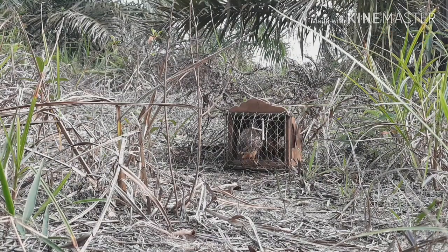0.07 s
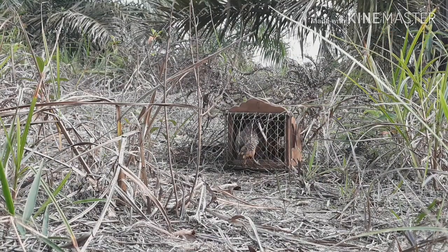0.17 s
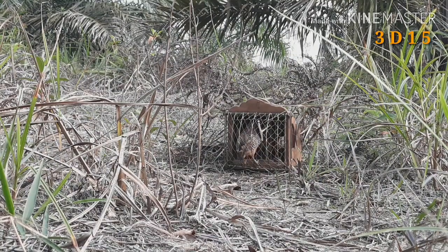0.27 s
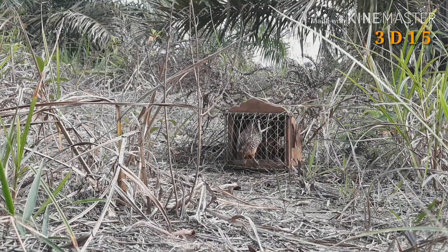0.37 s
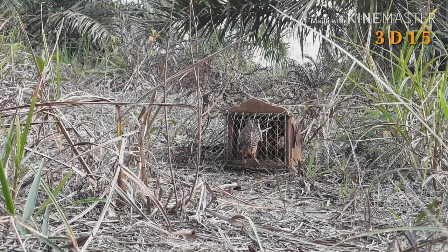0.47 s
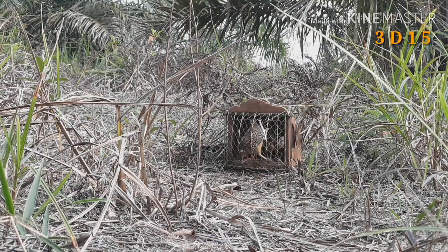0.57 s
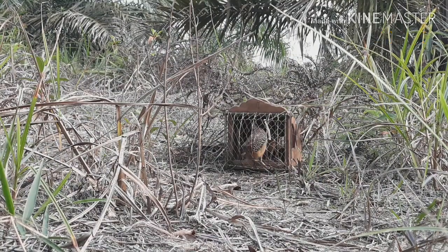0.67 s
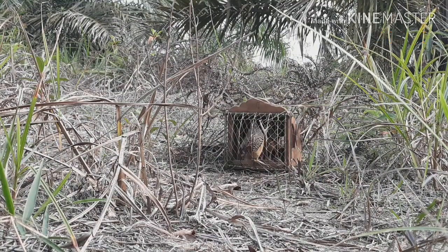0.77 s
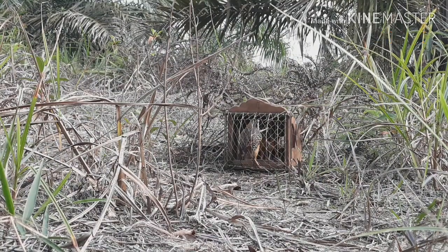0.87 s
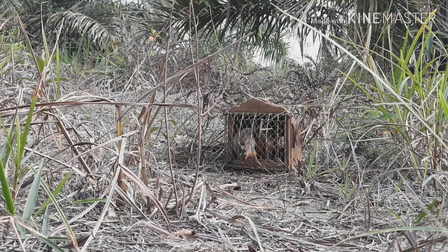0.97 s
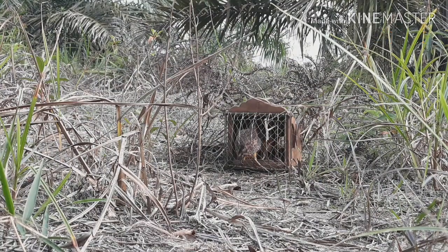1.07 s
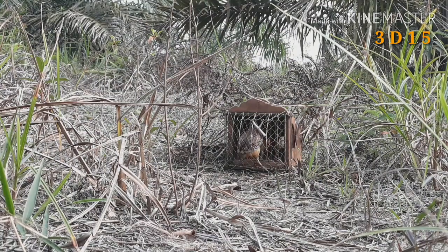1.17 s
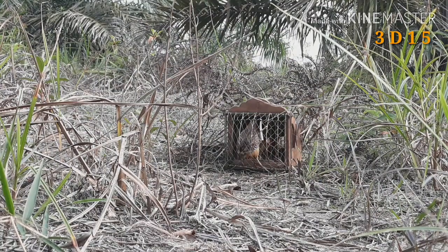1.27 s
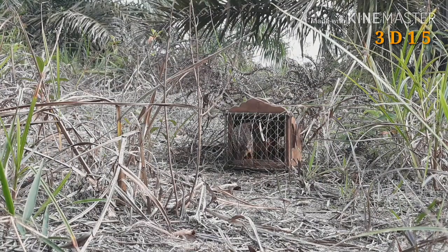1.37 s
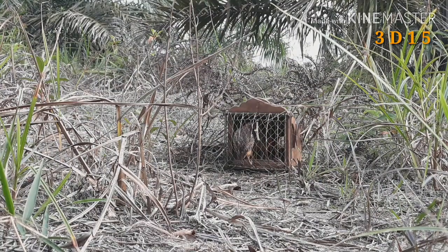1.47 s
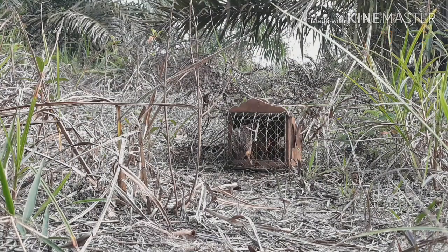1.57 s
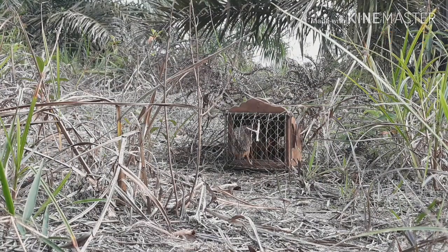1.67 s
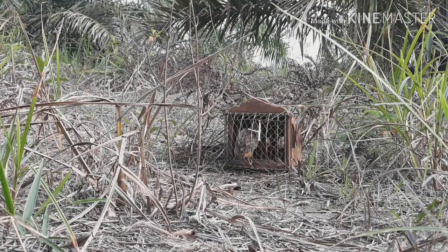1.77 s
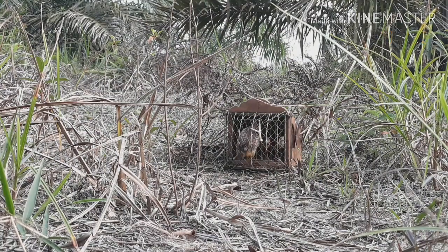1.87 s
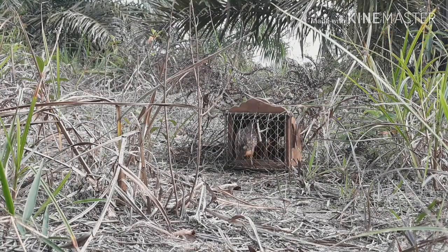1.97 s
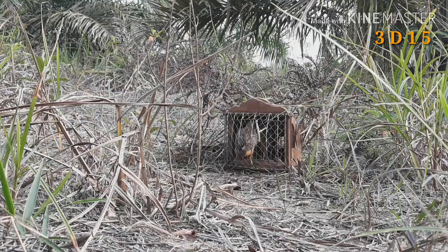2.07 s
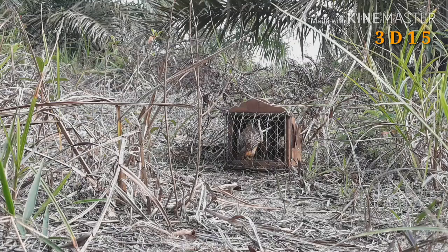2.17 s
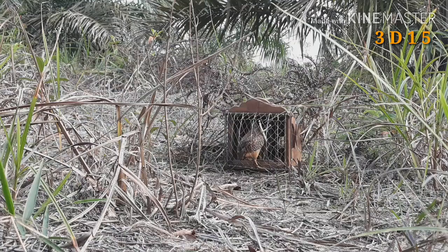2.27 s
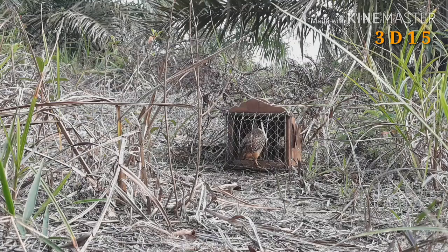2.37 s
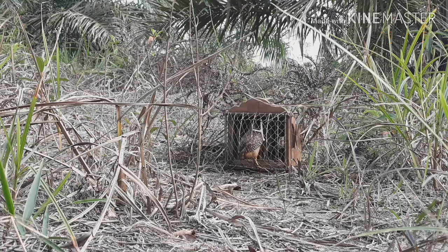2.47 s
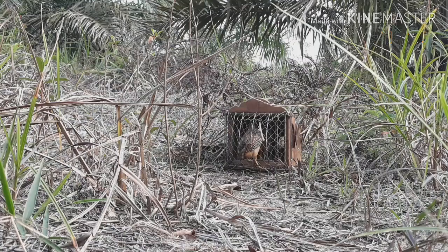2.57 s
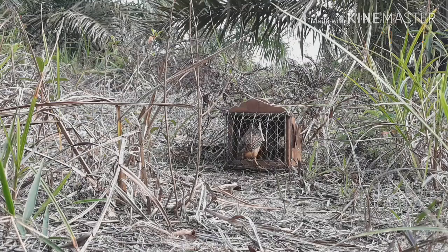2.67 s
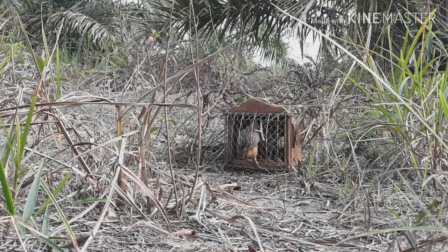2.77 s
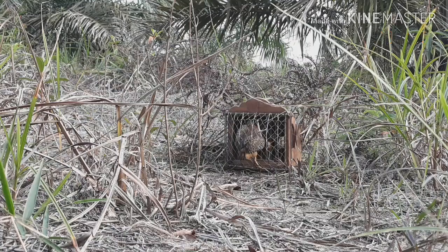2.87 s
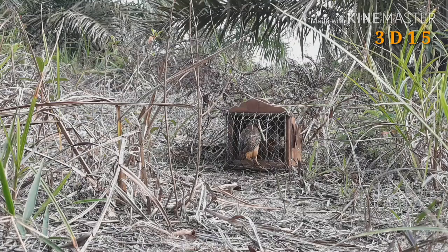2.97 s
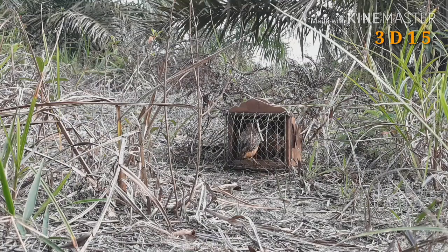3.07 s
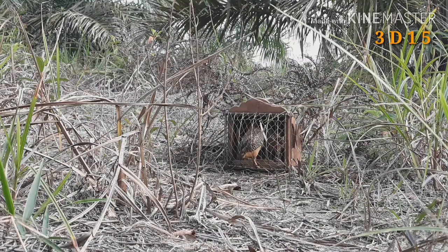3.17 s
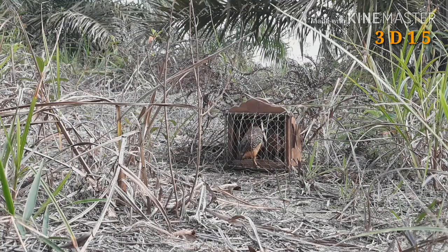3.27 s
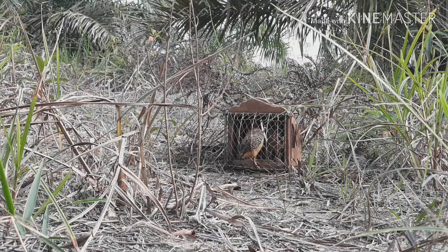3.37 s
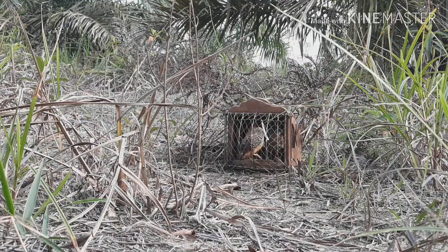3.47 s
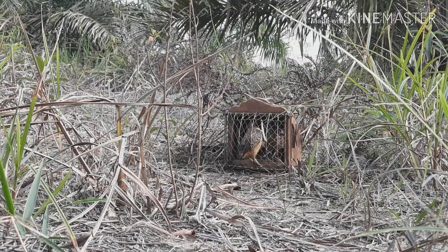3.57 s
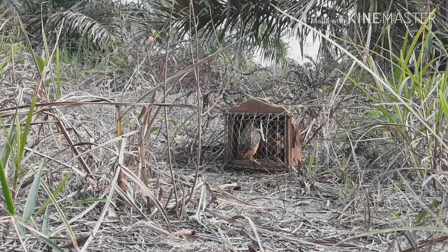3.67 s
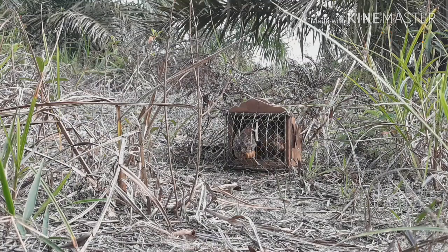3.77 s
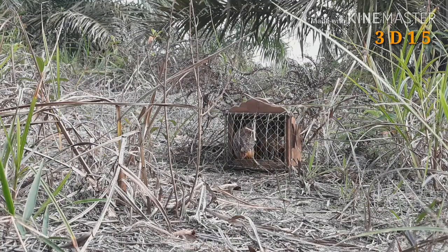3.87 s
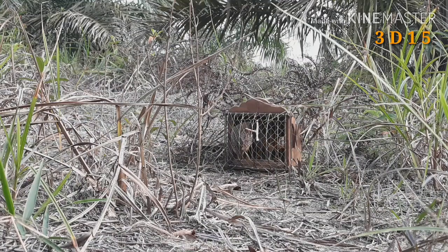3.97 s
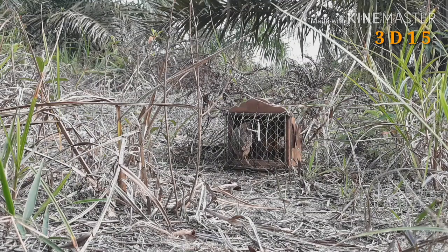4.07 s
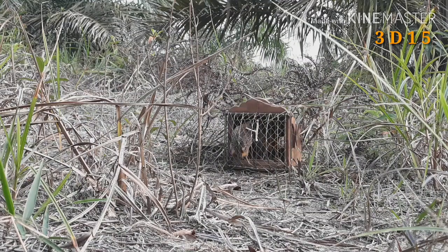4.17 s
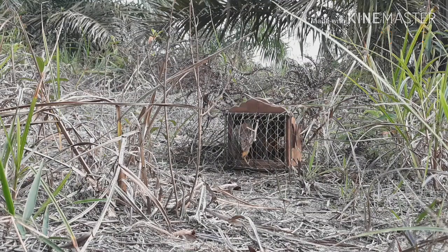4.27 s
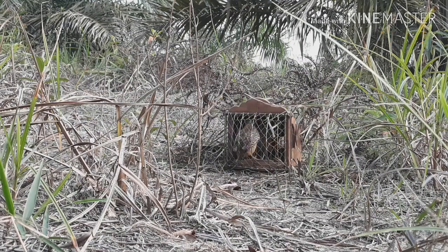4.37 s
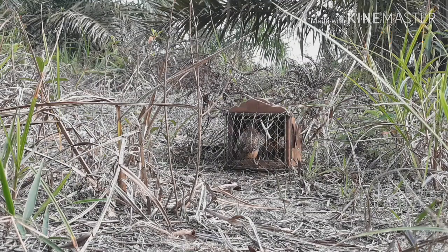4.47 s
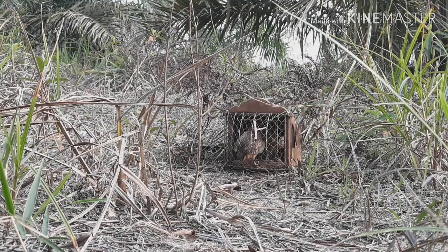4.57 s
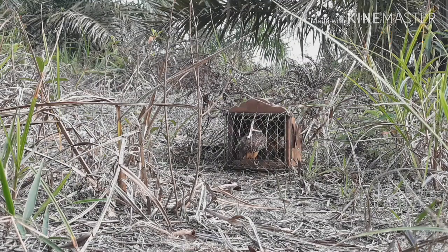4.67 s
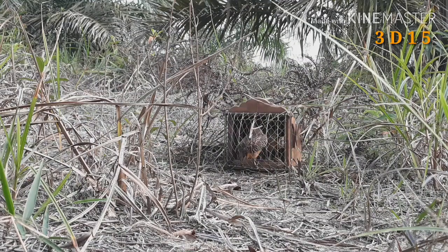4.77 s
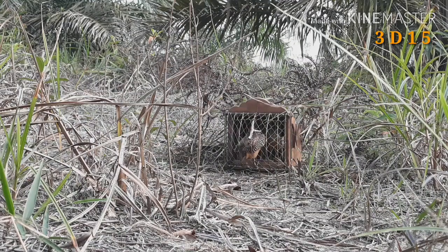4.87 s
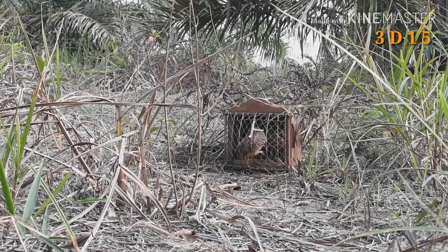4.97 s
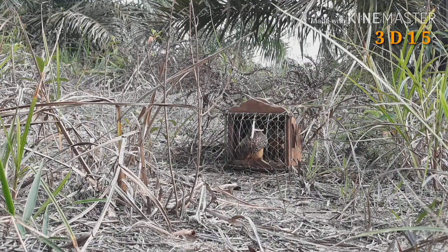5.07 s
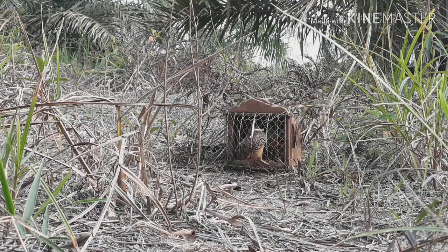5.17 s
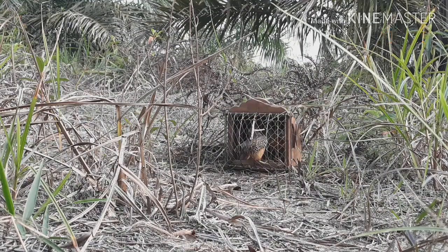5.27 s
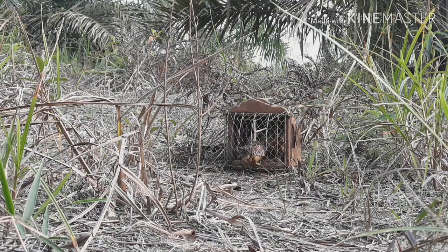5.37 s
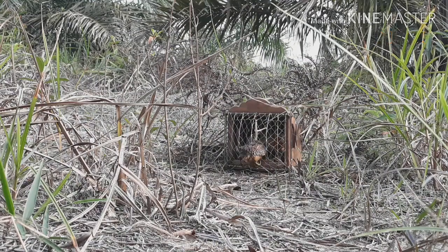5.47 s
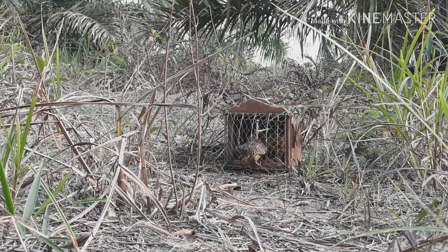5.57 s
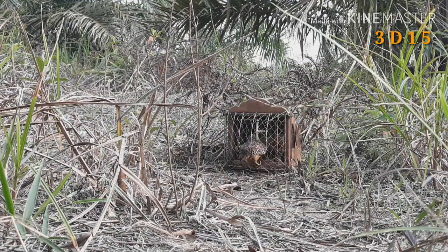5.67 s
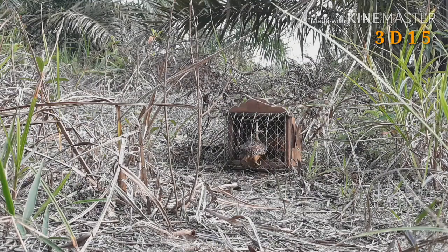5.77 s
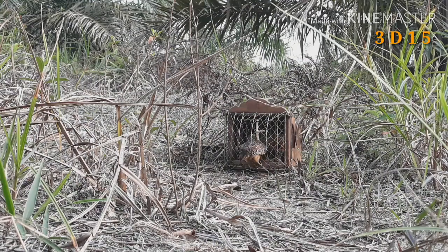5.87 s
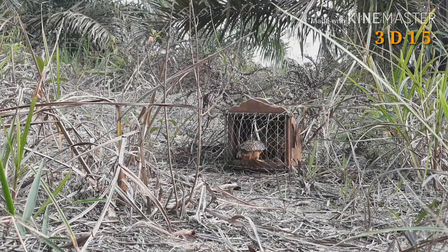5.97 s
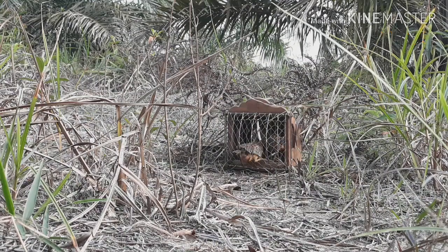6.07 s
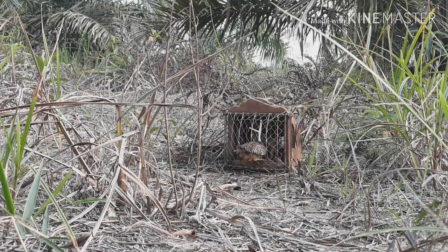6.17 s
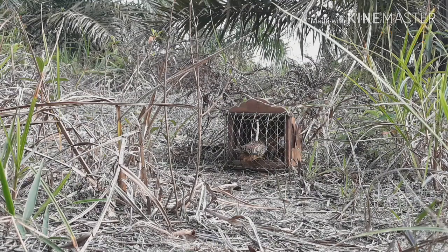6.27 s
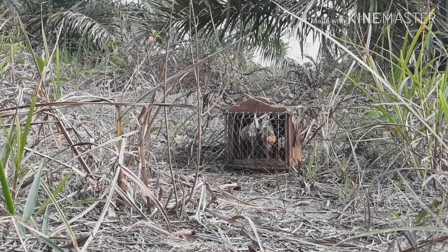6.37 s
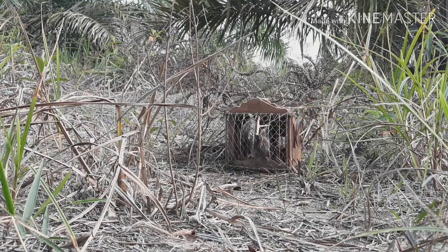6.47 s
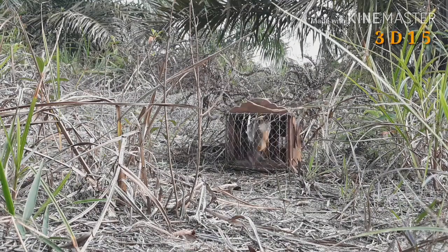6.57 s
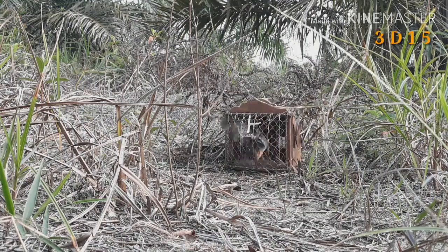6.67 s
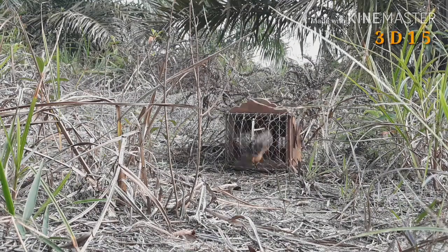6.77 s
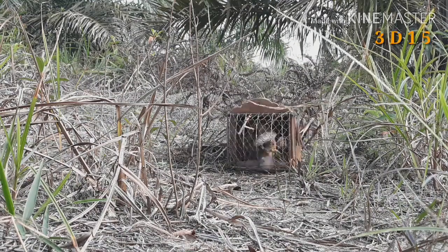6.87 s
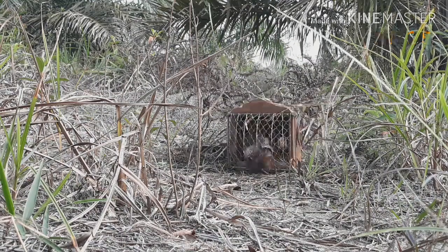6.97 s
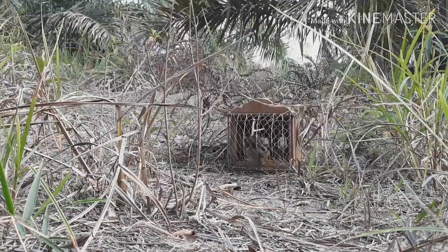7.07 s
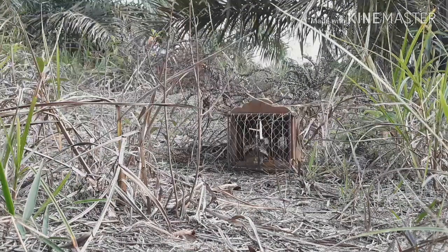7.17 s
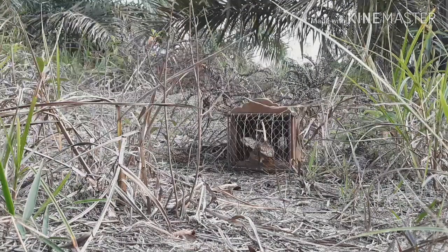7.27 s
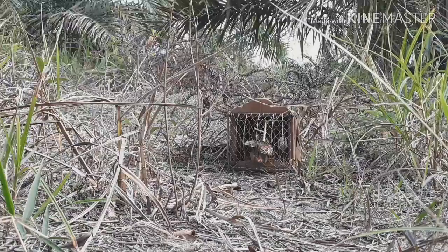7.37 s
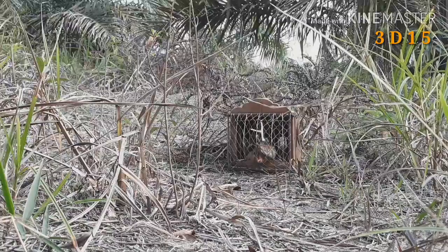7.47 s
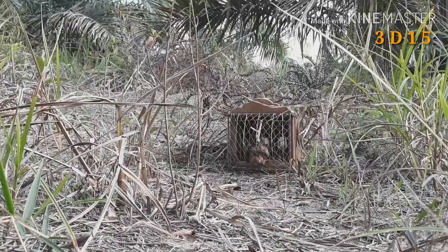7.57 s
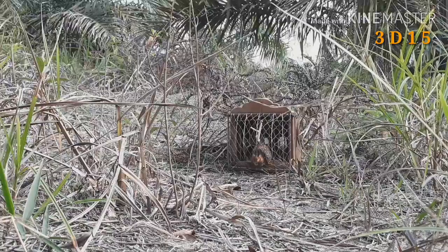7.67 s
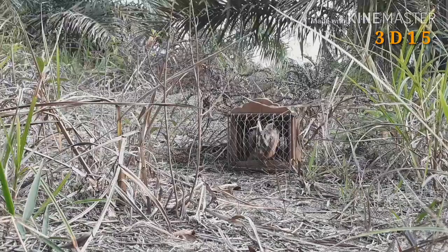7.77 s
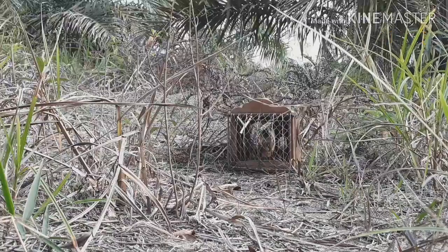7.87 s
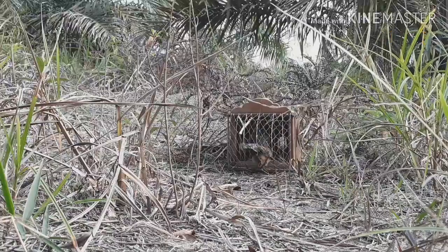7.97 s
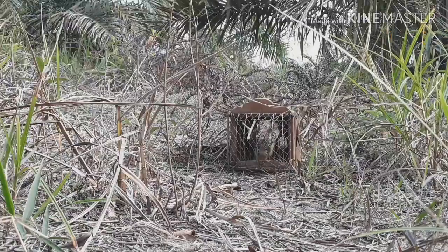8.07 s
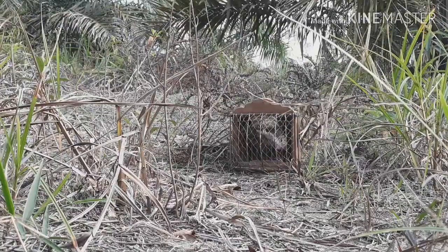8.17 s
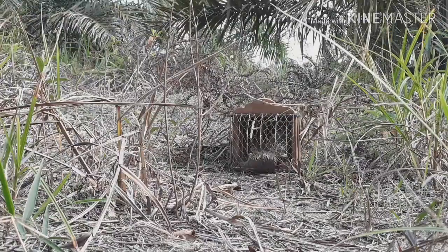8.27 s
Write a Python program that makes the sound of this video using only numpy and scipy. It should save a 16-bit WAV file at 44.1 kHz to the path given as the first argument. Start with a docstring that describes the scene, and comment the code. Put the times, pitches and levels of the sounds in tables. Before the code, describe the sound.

A caged quail scuffles and knocks on thin wooden boards, claws ticking on wire mesh and wings rustling, over faint outdoor hiss.

```python
"""Knocks and scuffles on thin boards: a quail scrambles in a small wood and wire cage in dry scrub.
Feet and body ring the boards' modes, claws and beak tick on the mesh, feathers rustle and brush the
wires, wings thrash the grass bedding and a strained joint creaks. Behind: a throbbing cricket, field
hiss, a distant engine slowing down, a low drone, a far songbird and another bird's rasping chatter."""
import sys
import numpy as np
from scipy import signal
from scipy.fft import rfft, irfft, next_fast_len
from scipy.io import wavfile

SR = 44100
rng = np.random.default_rng(int(sys.argv[2]) if len(sys.argv) > 2 else 0)


def int16_out(signal):
    """Quantize to a 16-bit WAV file."""
    q = np.round(np.clip(np.atleast_2d(signal).T, -1, 1) * 32767)
    wavfile.write(sys.argv[1], SR, q.astype(np.int16))


N = 366912

# Table levels are relative within a layer.
# Each row: start in seconds, strength in dB, pitch of the spot struck in Hz, rattle t60 in seconds.
BOARD_KNOCKS = [(.021, -8, 980, 0.047), (.107, -16, 950, 0.05), (.114, -24, 720, .05),
                (.184, -14.5, 398, .08), (.185, -16, 2070, .04), (.217, -30, 1260, .08),
                (.26, -39, 1220, .067), (.285, -37, 1190, .03), (.311, -30, 800, .05),
                (.315, -17, 1390, 0.035), (.439, -54.5, 1170, 0.07), (.671, -47, 564, 0.093),
                (.713, -49, 1150, 0.073), (.749, -35, 1010, 0.059), (.78, -40, 600, .08),
                (.804, -38, 950, 0.22), (.985, -45.5, 581, .14), (1.011, -39.5, 1090, 0.067),
                (1.034, -16.5, 960, 0.03), (1.04, -22, 600, .05), (1.061, -33, 1180, 0.15),
                (1.135, -41, 646, .055), (1.199, -36, 1770, 0.1), (1.65, -47, 613, 0.11),
                (1.665, -44, 1200, .1), (1.757, -42, 800, 0.12), (1.805, -47, 1100, .05),
                (1.844, -37, 600, .07), (1.853, -38.5, 1200, 0.052), (1.866, -39, 500, .06),
                (1.878, -36, 760, 0.14), (1.922, -38, 1100, .03), (1.941, -29, 1220, 0.07),
                (1.943, -35, 600, .06), (1.989, -40, 468, .048), (2.036, -43, 458, .068),
                (2.088, -50, 1200, .05), (2.233, -51, 608, 0.069), (2.431, -46, 650, 0.17),
                (2.89, -27, 700, .13), (2.945, -41, 684, .05), (2.958, -40, 1120, .054),
                (2.974, -34, 1000, .14), (2.996, -26, 900, 0.06), (3.004, -33, 610, .06),
                (3.083, -48, 1150, .15), (3.137, -56, 1000, 0.11), (3.352, -47.5, 980, .084),
                (3.469, -46, 476, .055), (3.548, -44.5, 490, 0.21), (3.629, -43, 382, .1),
                (3.785, -52, 1000, .06), (4.217, -46.5, 1210, 0.2), (4.339, -41, 1050, .074),
                (4.383, -22, 700, .08), (4.4, -25, 1050, .05), (4.407, -27, 600, .2),
                (4.469, -36, 620, .06), (4.552, -23, 1150, 0.08), (4.566, -30, 600, .08),
                (4.986, -39.5, 1470, 0.076), (5.073, -50.5, 1150, 0.086), (5.207, -30, 400, .03),
                (5.228, -17, 340, .06), (5.408, -32, 400, .085), (5.703, -50, 460, .06),
                (5.79, -40, 410, 0.032), (5.942, -49.5, 1080, .17), (6.05, -45, 1220, 0.2),
                (6.076, -26, 635, .06), (6.112, -37, 958, .08), (6.151, -33, 1150, 0.16),
                (6.203, -29, 980, 0.041), (6.238, -35, 1260, .06), (6.333, -8, 1130, .05),
                (6.343, -20, 600, .1), (6.363, -5, 1120, 0.03), (6.37, -13, 1220, .08),
                (6.415, -29, 1240, .043), (6.437, -29, 1230, 0.12), (6.459, -30, 1900, .03),
                (6.496, -40, 1190, 0.037), (6.532, -26.5, 860, 0.15), (6.579, -33, 1050, .1),
                (6.591, -29, 1100, .06), (6.604, -25, 1200, .06), (6.675, -32.5, 500, .068),
                (6.724, -29, 1040, 0.11), (6.816, -28, 1150, .066), (6.828, -22, 1150, .06),
                (6.84, -5, 990, 0.11), (6.865, -26, 650, 0.13), (6.897, -26, 600, .04),
                (6.93, -23, 1500, 0.033), (6.97, -26, 896, 0.071), (7.02, -37, 600, .1),
                (7.067, -39, 500, 0.067), (7.166, -16, 790, .07), (7.331, -48, 597, 0.028),
                (7.431, -42, 980, .078), (7.455, -53, 643, .053), (7.519, -45, 760, 0.14),
                (7.583, -46, 960, 0.087), (7.724, -33, 900, .034), (7.77, -31, 1000, 0.061),
                (7.795, -7, 1170, 0.11), (7.807, -20, 1000, .08), (7.869, -19, 620, .06),
                (7.873, -15, 1150, 0.094), (7.978, -30, 1230, .05), (8.008, -35, 700, 0.069),
                (8.04, -23, 1250, 0.035), (8.087, -24, 384, .02), (8.105, -3, 1060, .12),
                (8.1154, -11, 1060, .08), (8.122, -12, 594, 0.04), (8.129, -10, 700, .04),
                (8.146, -16, 1150, .1), (8.172, -19, 1100, .066), (8.186, -15, 1100, .06),
                (8.19, -17, 607, .076), (8.205, -16, 1020, 0.05), (8.235, -25, 1110, .04),
                (8.249, -29, 638, .06), (8.289, -18, 930, .06)]
# Each row: frequency in Hz, level in dB, t60 in seconds.
BOARD_MODES = [(213, -22.5, 0.014), (325, -7.5, 0.041), (395, -10, 0.035), (487, -3.5, 0.032),
               (606.6, -1.5, 0.052), (714, -5.5, 0.053), (836, -2.5, 0.018), (957.4, -2, 0.034),
               (1059, -2, 0.029), (1171, 3, 0.021), (1246, -5, 0.038), (1487, -6, 0.018),
               (1674, -3.5, 0.013), (1973, -15.5, 0.062), (2054, -10.5, 0.034)]
# Motion between blows. Each row: time in seconds, board rumble in dB, feather rustle in dB.
SCRAMBLE_CURVE = [(0.0, -49, -62), (.42, -60.5, -76), (.58, -77, -76), (.93, -62, -72.5), (1.3, -70, -74.5),
                  (1.6, -74, -74), (1.9, -59, -77), (2.2, -73.5, -90), (2.6, -81.5, -79.5),
                  (3.11, -72, -65.5), (3.7, -71, -70), (4.15, -79, -81), (4.42, -48, -59),
                  (4.61, -70.5, -70.5), (5.1, -82, -71), (5.23, -58, -47), (5.33, -63, -59),
                  (5.49, -77, -59), (5.6, -82, -70), (6.02, -73, -70), (6.15, -47, -57.5),
                  (6.29, -53.5, -63), (6.37, -38, -50), (6.62, -39, -54), (6.78, -46, -55),
                  (6.97, -31.5, -57), (7.11, -64, -72), (7.7, -65, -77), (7.9, -40.5, -54),
                  (8.06, -53.5, -64.5), (8.14, -37, -49.5), (8.32, -36, -49)]
# Body and wings on the boards. Each row: centre in seconds, level in dB, half-length in seconds.
BODY_DRAGS = [(.05, -53, 0.027), (1.89, -56, 0.037), (6.352, -28, .015), (6.455, -39.5, .03),
              (6.6, -34, 0.045), (6.74, -43, 0.024), (6.83, -29, 0.015), (6.875, -30.5, 0.032),
              (6.94, -43, 0.026), (7.815, -37, .025), (7.86, -34, 0.033), (7.93, -40.5, 0.032),
              (8.125, -29, 0.023), (8.2, -31, 0.031), (8.28, -38, 0.044)]
# Noise spectra. Each row: frequency in Hz, spectral density in dB.
RUSTLE_SPECTRUM = [(880, -68), (1500, -12.5), (3150, -3.5), (4870, 1), (6430, -4), (8830, -1), (10100, -2),
                   (14800, -9), (16000, -2)]
BEDDING_SPECTRUM = [(76, -51), (130, -0.5), (340, -0.5), (454, 0.5), (862, -8), (1100, -17), (1980, -3),
                    (6000, -11), (7800, -36), (13200, -120)]
FIELD_SPECTRUM = [(18, -29), (30, -16.5), (115, 9.5), (153, 1), (437, -20.5), (889, -71), (988, -66),
                  (1540, -34), (2680, -31.5), (4910, -19.5), (6550, -23.5), (7670, -23.5), (9710, -24),
                  (14800, -30.5), (16000, -19)]
# Each row: start in seconds, end in seconds, level in dB.
CRICKET_BOUTS = [(.0, .72, -70), (1.84, 2.3, -74.5), (3.994, 5.077, -71.5)]
# Each row: time in seconds, firing rate in Hz, level in dB.
ENGINE_CURVE = [(0.0, 61.55, -71), (.7, 59, -62.5), (5.37, 43.7, -64), (8.32, 43.2, -66)]
# Each row: frequency in Hz, level in dB.
DRONE_TONES = [(85, -72), (115, -78), (150.7, -60.5), (181, -67), (200, -71.5)]
# Each row: start in seconds, strength in dB, offset for the wires in dB, scrape t60 in seconds.
MESH_TICKS = [(0.013, -29.5, -15, .04), (.0297, -34.5, -5.5, .032), (.1856, -27.5, -2.5, 0.048),
              (.211, -40, -2, .088), (0.283, -34, -3.5, 0.064), (.316, -41, 5, .03),
              (0.7804, -35, -5, 0.032), (0.81, -22, -9.5, 0.056), (.846, -37, -2.5, .12),
              (.948, -42, -12, .03), (.985, -40, -5, .03), (1.0686, -40.5, 3, .034), (1.113, -40, -10, .03),
              (1.1957, -29, -11, .06), (1.931, -39, -12, .044), (2.0868, -32, -12.5, .04),
              (2.3555, -32.5, -23, 0.15), (2.854, -45, -3.5, .03), (2.957, -36, -17, .04),
              (2.9761, -33, -22, .056), (2.9954, -27.5, -3, .033), (3.0807, -31, -8, 0.07),
              (3.1223, -39, -5, .04), (3.178, -36, -4, 0.025), (3.3164, -29.5, -30, 0.098),
              (3.548, -43, -1, .036), (3.6304, -30, -9, 0.039), (3.6656, -31, -18, .12),
              (3.8225, -29, -13, 0.16), (3.925, -34, -22, .04), (4.2123, -27, -11.5, 0.13),
              (4.332, -21, -14, .04), (4.399, -18, -10.5, 0.019), (4.4952, -39, -17, .04),
              (4.539, -41.5, 2, 0.045), (4.5775, -26, -18, 0.15), (5.071, -40, -6, 0.054),
              (5.18, -40, 4, .08), (5.207, -36, 7, .07), (5.229, -32, 6, .1), (5.25, -34, 4, .06),
              (5.709, -31, -10.5, 0.14), (5.8764, -30.5, -33, 0.098), (6.0715, -37.5, -6, 0.11),
              (6.0868, -37, -2, 0.14), (6.109, -30, -6, .11), (6.1296, -32, -11, .04),
              (6.1469, -18, -11, .12), (6.333, -26.5, 0.5, .097), (6.345, -29, -4, .046),
              (6.358, -22, 1, 0.07), (6.41, -27, -3.5, 0.075), (6.4346, -26.5, -4.5, 0.067),
              (6.4901, -33, -4, .052), (6.523, -28, -5, 0.14), (6.5795, -30, -0.5, .05),
              (6.59, -31, 2, .04), (6.604, -26, -6, .04), (6.615, -29, -8, .04), (6.6443, -21, -19, .013),
              (6.6816, -24, -24, .024), (6.718, -11, -15.5, .059), (6.814, -32, -2, .1),
              (6.826, -21, 0.5, 0.11), (6.841, -13.5, -6, .06), (6.8644, -24.5, -1, 0.055),
              (6.8946, -25.5, -1.5, 0.05), (6.934, -29, -1, 0.039), (6.9551, -34, -5, .065),
              (6.968, -32, -0.5, 0.073), (7.023, -41.5, 1, .035), (7.1653, -42.5, 4.5, 0.04),
              (7.7238, -44, -1, .05), (7.7712, -31, -0.5, 0.058), (7.795, -23, 0, 0.09),
              (7.818, -24.5, -6, .11), (7.834, -33, -4, .03), (7.855, -26, -1, 0.066),
              (7.869, -14.5, -8.5, 0.049), (7.918, -30, -7.5, 0.036), (7.967, -31, -20, .03),
              (7.9747, -28, -8.5, .11), (8.0017, -30, -9, 0.043), (8.097, -22, -24, 0.065),
              (8.1045, -12, 0, 0.09), (8.1445, -14, -12, 0.065), (8.172, -32, 2, .03),
              (8.1854, -28, 3.5, 0.05), (8.195, -30, 3, .03), (8.221, -30, -4, .03), (8.251, -27, -1, .045),
              (8.2585, -25, -5, .03), (8.266, -27, -3, .03), (8.2816, -19, -6, 0.053),
              (8.291, -24, -6, 0.044)]
# Resonances. Each row: frequency in Hz, width in Hz, level in dB.
WIRE_MODES = [(3174, 74, -5.5), (3914, 530, 0.5), (4760, 590, 2.5), (5200, 1040, 0), (7720, 430, -1.5),
              (9570, 200, -2.5)]
THROAT_FORMANTS = [(3890, 250, -4.5), (3380, 590, -9), (4720, 880, 0.5), (5420, 650, -1), (6500, 1600, -6)]
# Each row: start and length in seconds, first, middle and last pitch in Hz, level in dB.
SONG_NOTES = [(.065, 0.026, 2760, 2480, 3160, -61), (.125, .025, 3520, 3150, 2970, -61),
              (.232, .024, 2560, 2160, 2060, -53), (.322, 0.037, 3470, 3000, 3300, -59),
              (.1, .025, 1650, 2160, 2000, -60), (.235, .025, 3000, 2850, 2600, -64),
              (.5, .03, 2500, 2700, 2800, -68), (.357, .033, 3300, 3470, 3020, -63),
              (.36, .03, 1930, 1610, 1470, -61), (.435, 0.028, 2850, 3010, 2950, -65),
              (.57, .065, 3250, 2970, 3080, -61), (.642, .024, 3400, 2400, 2270, -60),
              (.66, 0.031, 3230, 3100, 2860, -67)]
# Each row: centre in seconds, level in dB, half-length in seconds, pitch of the wires touched in Hz.
WIRE_BRUSHES = [(.975, -60.5, 0.29, 4150), (1.563, -69, 0.18, 3760), (1.688, -66, .047, 4400),
                (2.36, -66, 0.091, 4600), (3.3, -66, 0.89, 4540), (4.245, -64, .08, 3650),
                (4.8, -66, 0.12, 4950), (5.05, -65, 0.12, 3400), (5.245, -49, 0.06, 3400),
                (5.403, -57, .21, 3680), (5.728, -52.5, 0.039, 4100), (5.934, -64, .12, 4300)]
# Each row: centre in seconds, level in dB, half-length in seconds.
WING_BEATS = [(.84, -52.5, 0.06), (1.09, -53.5, 0.042), (5.19, -44, 0.016), (5.216, -40, 0.012),
              (5.243, -35, .022), (5.37, -56.5, .085), (6.16, -42.5, .031), (6.23, -53, 0.053),
              (6.37, -41, 0.026), (6.6, -40.5, .041), (6.84, -33.5, 0.027), (6.92, -43.5, 0.053),
              (7.81, -43, .025), (7.87, -44, .05), (8.13, -40, 0.044), (8.27, -39.5, .092)]
# Each row: start in seconds, level in dB, length in seconds.
CHATTER_NOTES = [(2.656, -62, 0.042), (2.759, -60.5, .045), (2.888, -58, .055), (3, -57.5, .05),
                 (3.111, -59, 0.055), (3.224, -58.5, .055), (3.33, -56, 0.048), (3.444, -57, 0.046),
                 (3.553, -54, 0.045), (3.658, -56, 0.057), (3.787, -59, 0.076), (3.927, -58.5, 0.052),
                 (4.457, -58, .04), (4.568, -59.5, .055), (4.678, -54.5, 0.052)]
# Each row: start and length in seconds, first, middle and last slip rate in Hz, first and last dB.
JOINT_CREAKS = [(2.925, .075, 2120, 2150, 2150, -72, -70), (3.09, 0.071, 1984, 2300, 2330, -70, -69),
                (3.79, 0.12, 865, 690, 412, -66, -55), (4.402, .038, 2810, 2740, 2750, -52, -64),
                (5.075, .06, 568, 550, 520, -58, -68)]

UPPER_MODES_HZ = 1400


def from_db(db):
    """Decibels to gain."""
    return 10 ** (np.asarray(db) / 20)


def rms_one(x):
    """Scale to rms 1."""
    return x / np.sqrt(np.mean(x ** 2) + 1e-20)


def in_time(rows):
    """Columns of a curve, one value a sample."""
    times_s, *columns = np.transpose(rows)
    return [np.interp(np.arange(N) / SR, times_s, column) for column in columns]


def add(out, start_s, piece):
    """Mix a piece in."""
    at = max(round(start_s * SR), 0)
    out[..., at:at + piece.shape[-1]] += piece[..., :N - at]


def dying(t60_s):
    """Exponential fade by 60 dB."""
    return from_db(-60 * np.arange(round(t60_s * SR)) / SR / t60_s)


def swells(events):
    """Smooth rise and fall around each centre."""
    out = np.zeros(N)
    for centre_s, db, half_s in events:
        add(out, centre_s - half_s, from_db(db) * np.hanning(round(2 * half_s * SR)))
    return out


def drift(rate_hz):
    """Smooth random wander; rms 1."""
    hop = 40
    r = np.exp(-2 * np.pi * rate_hz * hop / SR)
    slow = signal.lfilter([1], [1, -2 * r, r * r], rng.standard_normal(N // hop + 2002))[2000:]
    return np.interp(np.arange(N) / hop, np.arange(len(slow)), rms_one(slow))


def jumps(per_s, spread_db, cap):
    """Random impulses, a few much larger than the rest."""
    sizes = np.minimum(rng.exponential(1, N), cap)
    return from_db(spread_db * sizes) * (rng.random(N) < per_s / SR)


def grains(per_s, spread_db, noise_gain):
    """Uneven clicks over a bed of noise; rms 1."""
    noise = rng.standard_normal(N)
    clicks = jumps(per_s, spread_db, cap=4.06) * np.sign(noise[::-1])
    return rms_one(rms_one(clicks) + noise_gain * noise)


def clumps(per_s, spread_db, t60_s):
    """Gain that jumps at random and sinks back; rms 1."""
    r = from_db(-60 / (t60_s * SR))
    return rms_one(1.7 + signal.lfilter([1], [1, -r], jumps(per_s, spread_db, cap=3.1)))


def coloured(x, spectrum):
    """Shape by a spectrum; rms 1."""
    size = next_fast_len(N)
    hz, db = np.transpose(spectrum)
    gain = from_db(np.interp(np.log(np.fft.rfftfreq(size, 1 / SR) + 1), np.log(hz), db))
    return rms_one(irfft(rfft(x, size) * gain, size)[:N])


def band(x, low_hz, high_hz):
    """Causal band-pass."""
    return signal.sosfilt(signal.butter(2, [low_hz, high_hz], "band", fs=SR, output="sos"), x)


def resonate(x, hz, width_hz):
    """One resonance, peak gain 1."""
    r = np.exp(-np.pi * width_hz / SR)
    poles = [1, -2 * r * np.cos(2 * np.pi * hz / SR), r * r]
    return signal.lfilter(np.array([1, 0, -1]) * (1 - r * r) / 2, poles, x)


def glide(length_s, hz, db, harmonics_db):
    """A tone sliding through evenly spaced pitches and levels, faded in and out."""
    t = np.arange(0, length_s, 1 / SR)
    hz, db = (np.interp(t, np.linspace(0, length_s, len(points)), points) for points in (hz, db))
    phase = 2 * np.pi * np.cumsum(hz) / SR
    wave = sum(from_db(level) * np.sin(k * phase) for k, level in enumerate(harmonics_db, 1))
    return np.sqrt(2) * wave * from_db(db) * signal.windows.tukey(len(t), .49)


def footfalls(rumble_db, count=36, usual_rumble_db=-64, t60_s=.088):
    """Light random steps as knock rows, stronger while the bird scrambles."""
    rows = []
    for when, size, spot in rng.random((count, 3)):
        rise_db = rumble_db[int(when * N)] - usual_rumble_db
        rows.append((when * N / SR, -60.5 + 2 * size + .4 * rise_db, 420 * 2.9 ** spot, t60_s))
    return rows


def knocks(rows, rattle):
    """Force on each mode, and the struck spots' low and high rings. Hard knocks strike, soft rattle."""
    hz = np.transpose(BOARD_MODES)[0]
    forces, rings = np.zeros((len(hz), N)), np.zeros((2, N))
    contact = np.hanning(170)   # about 4 ms
    blow = contact / contact.sum() * np.cos(2 * np.pi * np.outer(hz, np.arange(len(contact))) / SR)
    spot_fade = dying(t60_s=.03)
    t = np.arange(len(spot_fade)) / SR
    spot_fade *= 1 - np.exp(-(t / .0018) ** 2)
    for start_s, db, spot_hz, rattle_t60_s in rows:
        hardness = np.clip(.02 * (db + 61), 0, .93)
        fade = dying(rattle_t60_s)
        fade *= 1 - np.exp(-np.arange(len(fade)) / SR / .0016)
        jolts = rms_one(fade * np.resize(rattle[round(start_s * SR):], len(fade)))
        shake = .081 * (1 - hardness) * jolts * np.sqrt(np.mean(fade ** 2)) * np.ones((len(hz), 1))
        shake[:, :len(contact)] += .75 * hardness * blow
        # Modes near the spot's pitch are favoured; upper modes need a hard blow.
        mode_db = -19 * np.minimum(abs(np.log2(hz / spot_hz)), .8)
        mode_db += (10 * (hardness - .7) - 1.5) * (hz > UPPER_MODES_HZ)
        mode_db += 2 * rng.standard_normal(len(hz))
        add(forces, start_s, from_db(db + mode_db)[:, None] * shake)
        ring = from_db(db - 11) * hardness * spot_fade * np.sin(2 * np.pi * spot_hz * t)
        add(rings[int(spot_hz > UPPER_MODES_HZ)], start_s, ring)
    return forces, rings


def boards(rumble_db):
    """Knocks, scuffling and drags drive the damped modes of a hollow wooden box."""
    rattle = grains(1500, 2.76, .47)
    forces, rings = knocks(BOARD_KNOCKS + footfalls(rumble_db), rattle)
    scuffle = from_db(rumble_db - 28.5) * clumps(140, 4, .06) + from_db(-30.5) * swells(BODY_DRAGS)
    for k, (hz, db, t60_s) in enumerate(BOARD_MODES):
        r, w = from_db(-60 / (t60_s * SR)), 2 * np.pi * hz / SR
        force = forces[k] + scuffle * np.roll(rattle, 5000 * k)   # each mode shaken differently
        mode = signal.lfilter([0, np.sin(w)], [1, -2 * r * np.cos(w), r * r], force)
        rings[int(hz > UPPER_MODES_HZ)] += from_db(db) * mode
    low, high = rings
    low = signal.sosfilt(signal.butter(4, UPPER_MODES_HZ + 100, fs=SR, output="sos"), low)
    # Thin boards radiate little bass; soft feet give little treble.
    return band(band(low + high, 265, 3340), 199, 3400)


def feather_rustle(rustle_db):
    """Feathers crackle in bursts, partly shared, partly different in each band."""
    crackle = coloured(grains(5000, 3, .45), RUSTLE_SPECTRUM)
    shared = clumps(150, 2.2, .015)
    edges_hz = np.geomspace(1200, 18000, 6)
    rustle = sum(band(crackle, *pair) * clumps(120, 1, .026) for pair in zip(edges_hz, edges_hz[1:]))
    return from_db(rustle_db + 9) * rms_one(shared * rustle)


def cricket(hz=7640, width_hz=190, chirps_per_s=15):
    """A narrow hiss in throbbing bouts."""
    gain, noise = np.zeros(N), rng.standard_normal(N)
    for start_s, end_s, db in CRICKET_BOUTS:
        t = np.arange(0, end_s - start_s, 1 / SR)
        throb = .5 + np.cos(np.pi * chirps_per_s * t) ** 2
        add(gain, start_s, from_db(db) * throb * signal.windows.tukey(len(t), .1))
    return gain * rms_one(resonate(resonate(noise, hz, width_hz), hz, width_hz))


def engine():
    """A distant engine's firing note sinks as it slows."""
    hz, db = in_time(ENGINE_CURVE)
    return np.sqrt(2) * from_db(db + 1.5 * drift(6)) * np.sin(2 * np.pi * np.cumsum(hz) / SR)


def drone(width_hz=4):
    """Low wavering tones: noise through narrow resonances."""
    noise = rng.standard_normal(N)
    return sum(from_db(db) * rms_one(resonate(noise, hz, width_hz)) for hz, db in DRONE_TONES)


def field_hiss(level_db=-56.5):
    """Near-steady low rush and hiss of the field."""
    return from_db(level_db + .2 * drift(5)) * coloured(rng.standard_normal(N), FIELD_SPECTRUM)


def mesh_ticks():
    """Claws and beak hit the mesh: a sharp edge and a short scrape, uneven over wires and treble."""
    treble_hz = [(5500, 9000), (9000, 12500), (12500, 17000)]
    edge = np.hanning(90)
    treble, wires = np.zeros((3, N)), np.zeros((len(WIRE_MODES), N))
    for start_s, db, wire_db, t60_s in MESH_TICKS:
        scrape = .18 * dying(t60_s)
        scrape[:len(edge)] += .14 * edge
        scrape[:40] *= np.linspace(0, 1, 40)
        treble_db = db + 1.5 * rng.standard_normal((3, 1))
        treble_db[0] += .25 * min(wire_db + 14, 0)   # weak wires thin the lowest band too
        add(treble, start_s, from_db(treble_db) * scrape)
        add(wires, start_s, from_db(db + wire_db + 3 * rng.standard_normal((len(wires), 1))) * scrape)
    grit = grains(2500, 3, .7)
    air = sum(band(gain * grit, *pair) for gain, pair in zip(treble, treble_hz))
    ring = sum(from_db(db + 9.5) * resonate(gain * grit, hz, width_hz)
               for gain, (hz, width_hz, db) in zip(wires, WIRE_MODES))
    clack = band(wires.mean(axis=0) * grit, 1400, 4840)
    return from_db(2.5) * air + ring + from_db(-1.5) * clack


def songbird():
    """Short gliding whistles with a fluttering level."""
    out = np.zeros(N)
    for start_s, length_s, *hz, db in SONG_NOTES:
        add(out, start_s, glide(length_s, hz, [db], harmonics_db=[0]))
    return out * from_db(2.8 * drift(70) - 7.5)


def with_scrub_echo(x, t60_s=.13):
    """Dense reflections from the scrub smear the sound."""
    fade = dying(t60_s)
    echoes = from_db(-28) * fade * rng.standard_normal(SR)[:len(fade)]
    return x + signal.fftconvolve(x, echoes)[:N]


def wire_brushes():
    """Feather barbs rasp over the mesh; each sweep favours the wires it touches."""
    out, barbs = np.zeros(N), grains(2500, 2, 1)
    ring = sum((-1) ** k * from_db(db) * resonate(barbs, hz, width_hz)
               for k, (hz, width_hz, db) in enumerate(WIRE_MODES))
    rasp = band(ring + .49 * resonate(barbs, 3870, 150), 2400, 7600) * clumps(160, 1.8, .023)
    for centre_s, db, half_s, hz in WIRE_BRUSHES:
        start_s, size = centre_s - half_s, round(2 * half_s * SR)
        sweep = rasp[round(start_s * SR):][:size]
        sweep = rms_one(resonate(sweep, hz, 2900) + .7 * sweep)
        add(out, start_s, from_db(db) * np.hanning(size) * sweep)
    return out


def wing_beats():
    """Wings thrash the dry grass bedding and puff air."""
    thrash = coloured(grains(3000, 1.2, .85), BEDDING_SPECTRUM) * clumps(200, 4.3, .077)
    puff = from_db(-9) * rms_one(band(rng.standard_normal(N), 54, 305))
    return swells(WING_BEATS) * (thrash + puff)


def chatter(echo_t60_s=.4, low_cut_hz=3050):
    """Rough pulses through a far bird's throat; each note has its own colour and an echoing tail."""
    pulses, gains = grains(1500, 2.5, .6), np.zeros((len(THROAT_FORMANTS), N))
    for start_s, db, length_s in CHATTER_NOTES:
        colour_db = 3.5 * rng.standard_normal((len(gains), 1))
        burst = signal.windows.tukey(round((length_s + .021) * SR), .7)
        add(gains, start_s - .008, from_db(db - 3 + colour_db) * burst)
    r = from_db(-60 / (echo_t60_s * SR))
    gains += from_db(2.5) * signal.lfilter([1 - r], [1, -r], gains + 1e-18)
    voice = sum((-1) ** k * from_db(db) * gains[k] * rms_one(resonate(pulses, hz, width_hz))
                for k, (hz, width_hz, db) in enumerate(THROAT_FORMANTS))
    return signal.sosfilt(signal.butter(4, low_cut_hz, "high", fs=SR, output="sos"), voice)


def creaks():
    """A strained joint slips at a gliding rate: fluttery tones with overtones."""
    out = np.zeros(N)
    for start_s, length_s, *hz, first_db, last_db in JOINT_CREAKS:
        add(out, start_s, glide(length_s, hz, [first_db, last_db], harmonics_db=[0, -13, -18]))
    return out * from_db(4 * drift(90))


def scene():
    """The cage in front, the field behind; mono."""
    rumble_db, rustle_db = in_time(SCRAMBLE_CURVE)
    cage = boards(rumble_db) + mesh_ticks() + wire_brushes() + feather_rustle(rustle_db) + wing_beats()
    tones = with_scrub_echo(songbird() + creaks())
    field = chatter() + cricket() + engine() + drone() + field_hiss()
    return (cage + tones + field)[None]


def record(dry):
    """Steep low-pass, 70 dB down from 16.2 kHz."""
    return signal.sosfilt(signal.cheby2(14, 70, 16200, fs=SR, output="sos"), dry)


dry = scene()
out = record(dry)
int16_out(out)
```